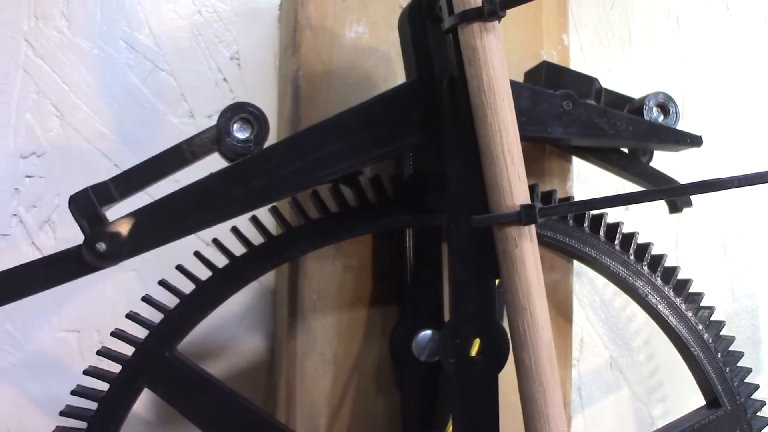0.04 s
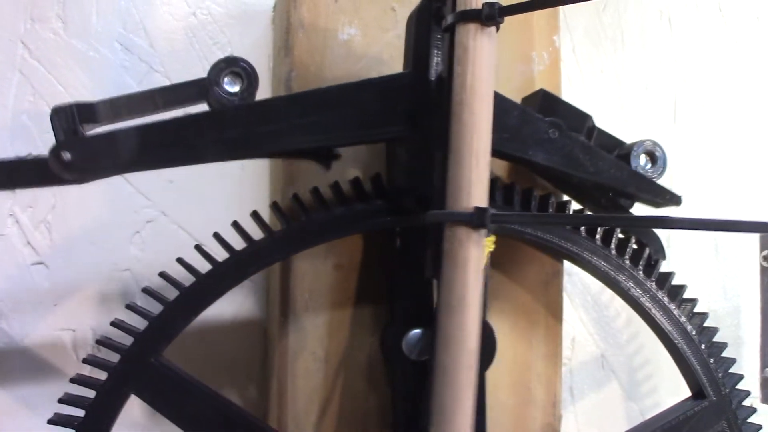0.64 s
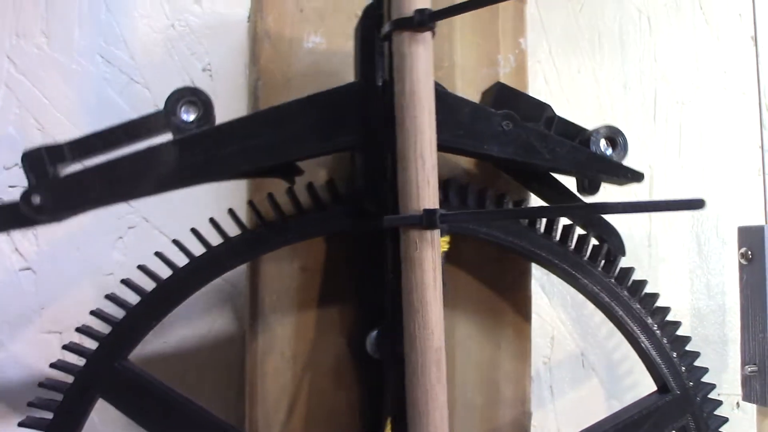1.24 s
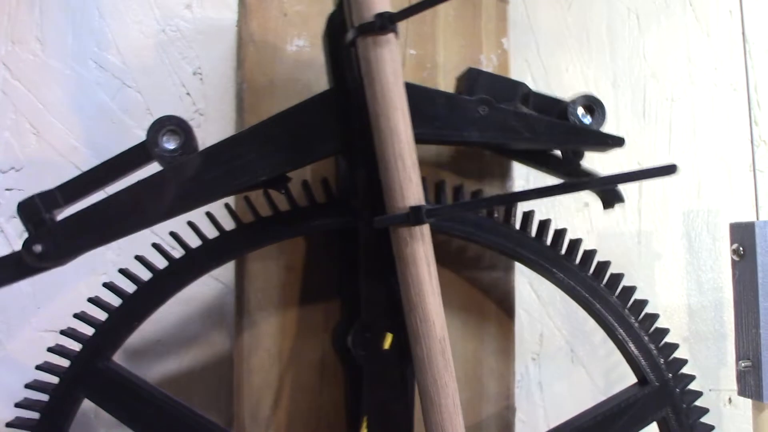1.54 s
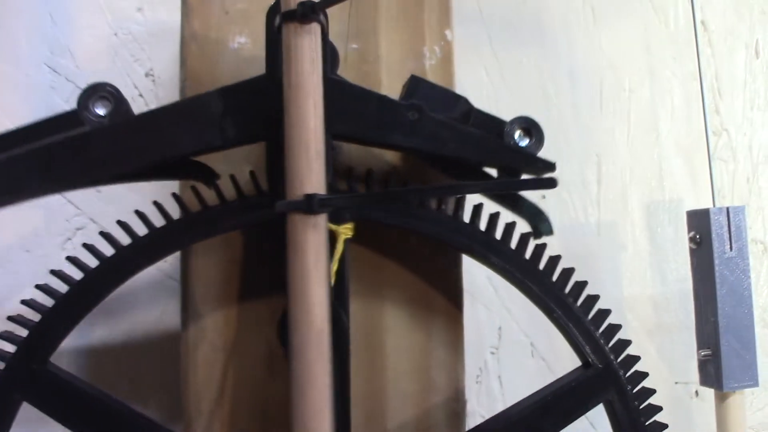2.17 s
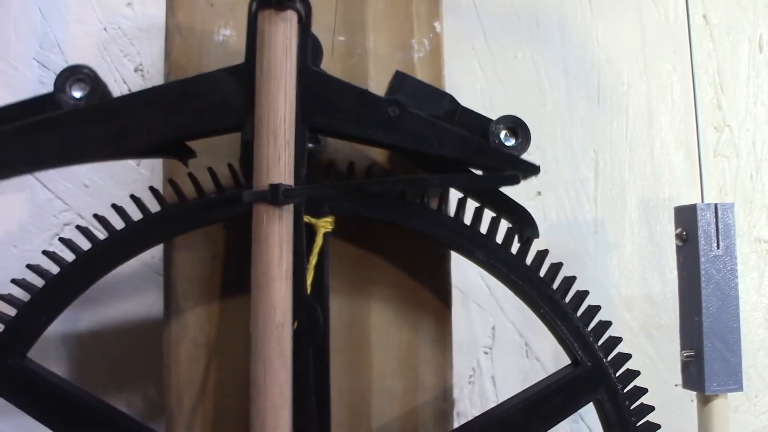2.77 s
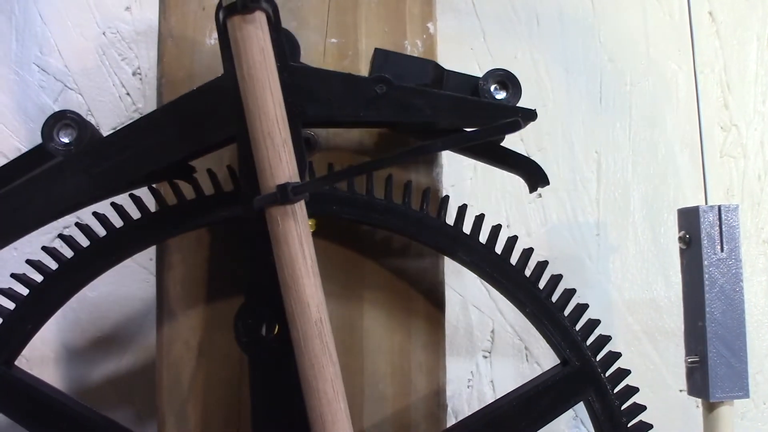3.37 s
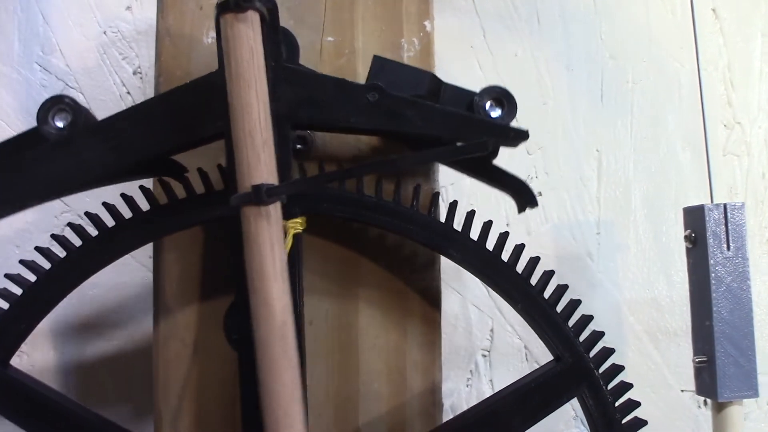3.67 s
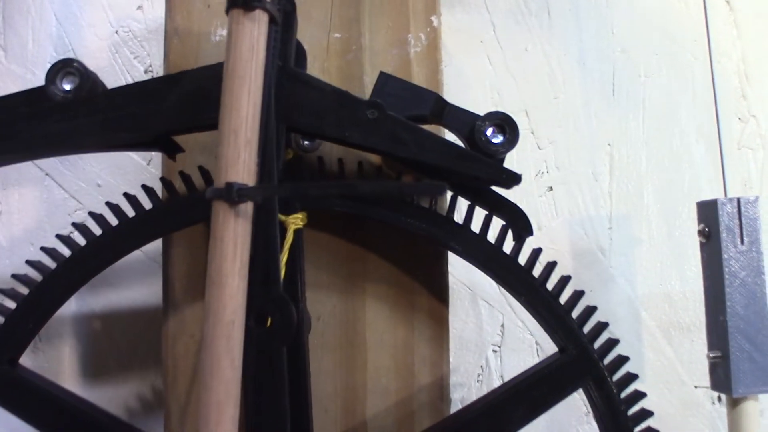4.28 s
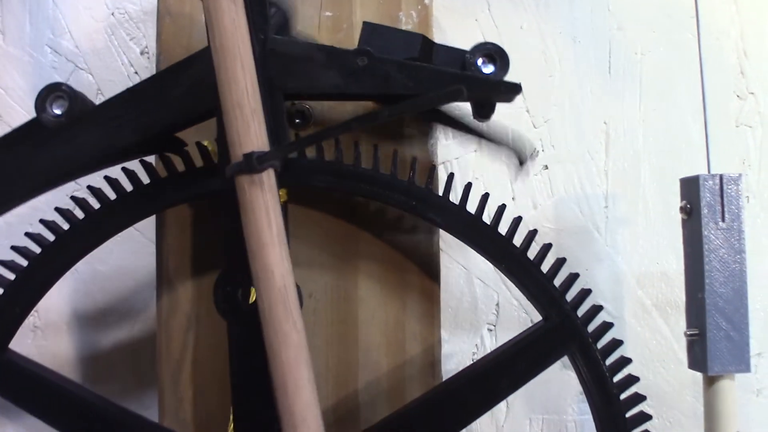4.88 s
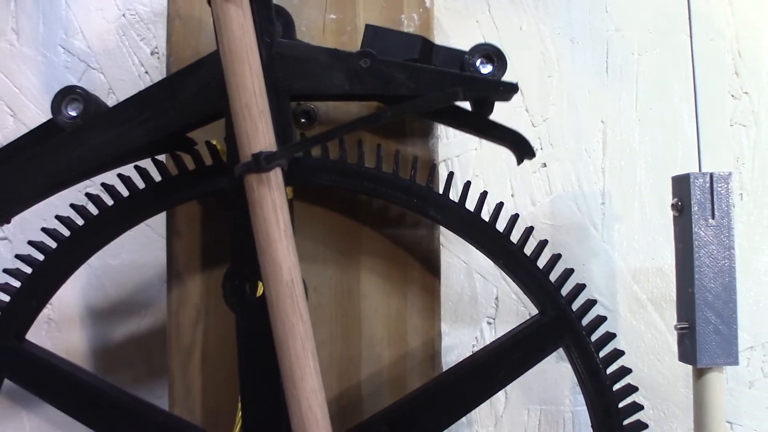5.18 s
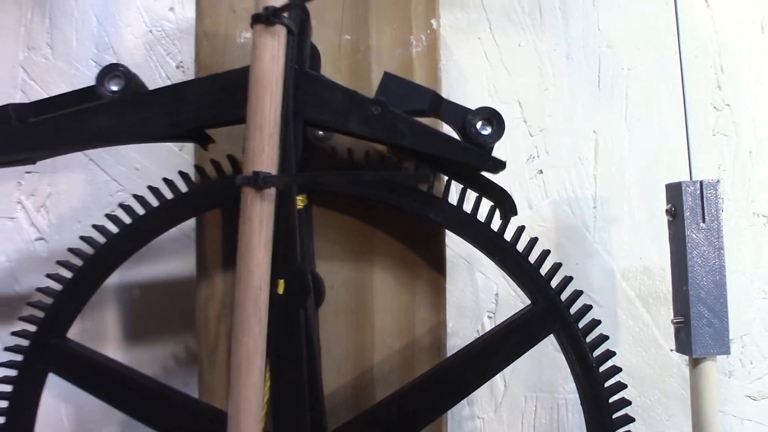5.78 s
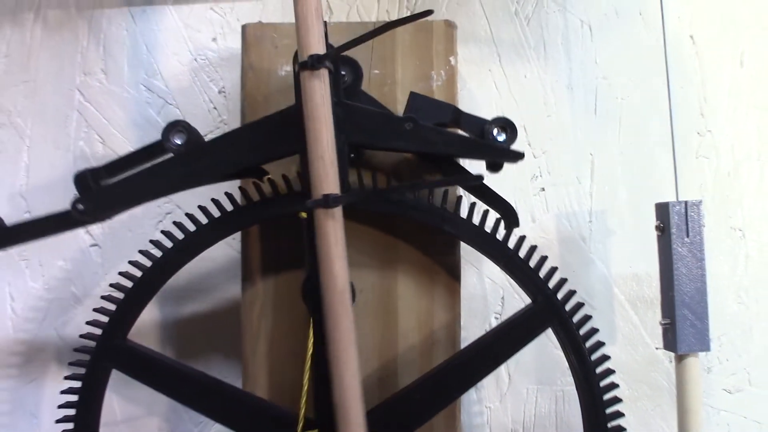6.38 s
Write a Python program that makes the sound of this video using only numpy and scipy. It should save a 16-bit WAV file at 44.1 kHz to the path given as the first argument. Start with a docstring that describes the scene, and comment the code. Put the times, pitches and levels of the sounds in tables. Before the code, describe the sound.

Slow, uneven sharp ticks from a plastic clock's catches and toothed wheel, with softer hollow knocks and light rubbing in a quiet workshop.

```python
"""In a quiet workshop, a plastic pendulum mechanism ticks close by.
Two catches take turns stopping a toothed wheel, one with a tock and one with a tick: each lifts, drops,
chatters and comes to rest, and the wheel bounces twice. The pendulum rubs once on every swing,
the rocking arm knocks on the frame, loose joints click, and the room hums."""
import sys
import numpy as np
from scipy import signal
from scipy.fft import rfft, irfft
from scipy.io import wavfile

SR = 44100
rng = np.random.default_rng(int(sys.argv[2]) if len(sys.argv) > 2 else 0)


def wav_out(sig):
    """Save sig, one row per channel (or a flat mono array), as 16-bit PCM at SR to the path in sys.argv[1]."""
    wavfile.write(sys.argv[1], SR, np.round(np.clip(np.atleast_2d(sig).T, -1, 1) * 32767).astype(np.int16))


N = 287532
T = np.arange(SR // 2) / SR  # seconds since a hit

# Knocks of the arm: t/s, level/dB, chatter/s, last touch/dB, brightness/(dB per octave), favoured f/Hz
KNOCKS = [(0.1758, -27, 0.0026, -14, 3.5, 1440), (.266, -40, 0.011, -3, -4, 1490),
          (1.1222, -29.5, 0.0018, -16, 2.5, 1640), (1.1424, -34.5, 0.019, -11, -2, 1340),
          (2.1636, -43.5, 0.0024, -3, -1.5, 1400), (2.53, -31, 0.0073, 3, 0, 1350),
          (2.922, -43, 0.0039, -15, -5.5, 1480), (3.7423, -31, 0.0054, -13, 2.5, 1120),
          (3.764, -31.5, .013, -9, -2, 1350), (5.1448, -29, 0.0039, 3, -0.46, 1226),
          (5.397, -48, 0.01, -7, -0.8, 1450), (6.3492, -24.5, 0.0043, 3, 1.35, 1090)]
# The wheel's "body", its many weak ringing tones blurred into noise: f/Hz, level/dB
WHEEL_BODY = [(150, -3), (260, -6.5), (780, -6.5), (1200, -13), (1900, -4), (2800, -2), (4500, 0),
              (5700, -0.5), (7500, -6), (9000, -10.5), (11000, -12), (12500, -18), (16000, -31)]


def amp(db):
    """Turn decibels into a number to multiply by."""
    return 10 ** (np.asarray(db) / 20)


def unit(x):
    """Scale a sound to an energy of one."""
    return x / np.sqrt(np.sum(x ** 2))


def rms(x):
    """The average strength of a sound (root mean square)."""
    return np.sqrt(np.mean(x ** 2))


def add(out, s, x):
    """Mix x into out, starting at s seconds."""
    i = max(int(s * SR), 0)
    out[i:i + len(x)] += x[:max(len(out) - i, 0)]


def noise(points, size, tilt_db=0):
    """Noise of strength one, shaped by (f/Hz, level/dB) points; tilt_db per octave makes it brighter."""
    octave = np.log2(np.maximum(np.fft.rfftfreq(size, 1 / SR), 1))
    hz, db = np.transpose(points)
    colour_db = np.interp(octave, np.log2(hz), db) + tilt_db * np.maximum(octave, np.log2(512))
    x = irfft(rfft(rng.standard_normal(size)) * amp(colour_db), size)
    return x / rms(x)


def wander(rate, size):
    """Glide to a new random value, usually within -1 to 1, rate times a second."""
    targets = rng.standard_normal(512)
    return np.interp(np.arange(size) / SR * rate, np.arange(len(targets)), targets)


def contacts(chatter_s, last_db, gap_s=0.0017, rise_s=0.00021):
    """Power fed into a part: a first hit, a buzz of tiny touches, and a last touch as it comes to rest."""
    count = max(int(chatter_s * SR), 2)
    power = np.zeros(len(T))
    buzz = rng.exponential(size=len(T))[:count] ** 3
    power[:count] = buzz / buzz.sum() * chatter_s / gap_s
    power[0] += 1
    power[count] += amp(last_db) ** 2
    # plastic gives a little, so each touch takes a moment to build
    return signal.lfilter([1], [1, -np.exp(-1 / (rise_s * SR))], power)


def ring(power, t60):
    """How strongly a part rings as it stores this power; t60 is the seconds it takes to fade by 60 dB."""
    keep = np.exp(-2 * np.log(1000) / (t60 * SR))
    return np.sqrt(signal.lfilter([1], [1, -keep], power + 1e-18))


def strike(power, tilt_db, modes, body, modes_db, body_t60, frame_db, frame_t60):
    """One hit: a bright crack, a short clack, the part's own tones (modes) and the frame's duller ring."""
    crack_db, linger_db = -5, -8
    frame_fade = unit(ring(power, frame_t60))
    crack = unit(noise(body, len(T), tilt_db + 1.5) * ring(power, t60=.002))
    clack = unit(noise(body, len(T), tilt_db) * ring(power, body_t60))
    frame = unit(noise(body, len(T), tilt_db - 1.5) * frame_fade)
    tones = 0
    for hz, db, t60 in modes:
        # the point of contact shifts, so each tone varies a little from hit to hit
        pitch_hz = hz * (1 + .002 * rng.standard_normal())
        phase = 2 * np.pi * (pitch_hz * T + rng.random())
        gain = amp(db + tilt_db * np.log2(max(hz, 500) / 4000) + .8 * rng.standard_normal())
        # part of each tone lingers in the frame
        fade = np.hypot(unit(ring(power, t60)), amp(linger_db + frame_db) * frame_fade)
        tones = tones + gain * unit(np.sin(phase) * fade)
    return unit(clack + amp(crack_db) * crack) + amp(modes_db) * tones + amp(frame_db) * frame


def hits(rows, modes, body, gain_db, modes_db, body_t60, frame_db, frame_t60):
    """Strike one part once per row; the row's level plus gain_db sets the strength of the first 20 ms."""
    out = np.zeros(N)
    for s, db, chatter_s, last_db, tilt_db in rows:
        power = contacts(chatter_s, last_db)
        x = strike(power, tilt_db, modes, body, modes_db, body_t60, frame_db, frame_t60)
        add(out, s, x * amp(db + gain_db) / rms(x[T < .02]))
    return out


def hit(s, db, chatter_s, last_db, tilt_db):
    """One row for hits()."""
    return s, db, chatter_s, last_db, tilt_db


def workshop(air_db=-49.5, hum_hz=90.8, hum_db=-58, whine_hz=7380, whine_db=-78, side_db=-73):
    """The room rumbles and hisses, with a wavering low hum and a faint high whine."""
    # Background noise of the room: f/Hz, level/dB
    room = [(12, -15), (20, -6), (59, -2.5), (95, -4), (161, -8), (196, -13.5), (315, -15), (416, -19),
            (452, -18), (834, -23), (1010, -24), (2400, -29.5), (5850, -33), (7310, -34), (15500, -39.5)]
    air = noise(room, N) * amp(air_db + 0.46 * wander(11, N))
    hum_phase = 2 * np.pi * np.cumsum(hum_hz + 2.17 * wander(9, N)) / SR
    hum = np.sin(hum_phase) * amp(hum_db + 3 * wander(5.01, N))
    whine_phase = 2 * np.pi * np.cumsum(whine_hz + 25 * wander(70, N)) / SR
    whine = np.sin(whine_phase) * amp(whine_db + 2 * wander(37, N))
    # faint noise, added on the left and taken away on the right, gives width
    side = noise([(25, -26), (70, 1), (300, 4), (1500, -4.5), (8000, -9.5), (13000, -6.5)], N)
    return air + np.sqrt(2) * (hum + whine) + np.array([[1], [-1]]) * side * amp(side_db)


def grit(length_s, release_s=0.015, grain_db=4.5, flutter_db=3.5, ring_db=-5):
    """Plastic slides on plastic: a gritty, fluttering hiss that makes the parts ring faintly."""
    # Hiss of sliding plastic: f/Hz, level/dB
    hiss_shape = [(300, 6), (1100, -1), (1700, 3), (3200, -2), (4800, -0.5), (5700, 4.5), (6500, 4),
                  (7300, -5), (8300, -8.5), (14000, -30)]
    # Tones of the rubbed parts: f/Hz, level/dB, t60/s
    rub_modes = [(1730, -10, .2), (2880, -14, .06), (4300, -10, .08), (5450, -8, .02), (5720, -4, .028),
                 (6300, -7, .035), (7150, -8, .035)]
    slide = np.exp(-np.maximum(T - length_s / 2, 0) / (release_s + length_s / 4))
    grip = amp(grain_db * wander(698, len(T)) + flutter_db * wander(73, len(T)))
    grains = noise(hiss_shape, len(T)) * grip * slide
    hiss = unit(grains)
    for hz, db, t60 in rub_modes:
        mode = np.sin(2 * np.pi * hz * T) * np.exp(-np.log(1000) * T / t60)
        hiss = hiss + amp(db + ring_db) * unit(signal.fftconvolve(grains, mode)[:len(T)])
    return hiss / rms(hiss[T < length_s])


def rubs(cycle_s=1.999):
    """Now and then a part scrapes dryly; the pendulum rubs once on the way out and once on the way back."""
    # Short, dry scrapes: t/s, length/s, hiss/dB
    scrapes = [(0.078, 0.025, -44.5), (4.346, 0.07, -58)]
    # The pendulum's two rubs: first t/s, length/s, hiss/dB, groan/dB
    swing_rubs = [(0.243, 0.069, -49.5, -46.5), (1.276, .1, -50.5, -51.5)]
    out = np.zeros(N)
    for first_s, length_s, hiss_db, groan_db in swing_rubs:
        for s in np.arange(first_s, N / SR, cycle_s):
            add(out, s, amp(hiss_db) * grit(length_s) + amp(groan_db) * groan(length_s))
    for s, length_s, hiss_db in scrapes:
        add(out, s, amp(hiss_db) * grit(length_s))
    return out


def arm(boost_db=5, reach_hz=90):
    """The long rocking arm knocks with a hollow ring; where it is hit decides which tone stands out."""
    # The arm's strong tones: f/Hz, level/dB, t60/s
    arm_modes = [(185.8, -7, 0.49), (1057, -6, 0.052), (1148, -4.5, 0.14), (1256, -12, 0.23),
                 (1408, -8, 0.16), (1487, -5.5, 0.15), (1660, -8.5, 0.057), (2192, -16, 0.054),
                 (2376, -6, 0.042), (2454, -8, 0.028), (3648, -4.5, 0.007), (4380, -7, 0.02),
                 (5220, -12, 0.028)]
    # Its blur of weak tones: f/Hz, level/dB
    arm_body = [(150, 3), (550, -4.5), (850, -1.5), (1200, 8), (1850, -3), (2400, -0.5), (3100, -3),
                (3800, 0.5), (5700, -2.5), (8000, -8), (9400, -19), (11000, -9.5), (12500, -26),
                (16000, -43)]
    out = np.zeros(N)
    for *knock, favoured_hz in KNOCKS:
        modes = [(hz, db + boost_db * np.exp(-((hz - favoured_hz) / reach_hz) ** 2), t60)
                 for hz, db, t60 in arm_modes]
        out += hits([knock], modes, arm_body,
                    gain_db=-2, modes_db=-1.5, body_t60=0.022, frame_db=-1, frame_t60=0.17)
    return out


def bumps(rise_s=0.0067, thump_hz=189.5, thump_db=-3.5, lag_s=0.00954):
    """The frame thumps under each knock, harder the longer the arm pushes; a few dull bumps come alone."""
    # Soft, low bumps: t/s, f/Hz, peak level/dB
    lone_bumps = [(0.946, 145, -38.5), (1.712, 108, -39), (3.614, 132, -38), (4.39, 119, -36.5),
                  (4.676, 132, -41)]
    thumps = [(s + lag_s, thump_hz, db + thump_db + 20 * np.log10(push_s / 0.017))
              for s, db, push_s, *_ in KNOCKS]
    out = np.zeros(N)
    swell = (T / rise_s) * np.exp(1 - T / rise_s)
    for s, hz, db in lone_bumps + thumps:
        add(out, s, amp(db) * swell * np.sin(2 * np.pi * hz * T))
    return out


def groan(length_s):
    """A low groan swells in the middle of the pendulum's rub."""
    # Low noise of the rub: f/Hz, level/dB
    groan_shape = [(200, -22), (315, -15), (348, 3), (380, -13), (420, -4), (480, -11), (700, -19),
                   (2000, -42)]
    swell = np.exp(-((T - 0.46 * length_s) / (.5 * length_s)) ** 2)
    x = noise(groan_shape, len(T)) * swell
    return x / rms(x[T < length_s])


def tocks(rebound_s=.038, bounce_ratio=.43, bounce_db=-14):
    """One catch lifts with a ping and drops with a buzz; the wheel springs back, then clicks to rest."""
    # Drops of this catch: t/s, level/dB, chatter/s, last touch/dB, brightness/(dB per octave),
    # head start of the lift/s, lift/dB, wheel's rebound/dB
    events = [(0.5935, -25.5, 0.0072, 2.5, -0.89, 0.037, -43, -34),
              (2.2629, -24.5, 0.012, -3, -.2, .0354, -46, -30),
              (3.9474, -25, .0105, -6, 0.57, 0.044, -39, -30.5),
              (5.6294, -26.5, 0.011, -6, 0.53, 0.046, -40.5, -31.5)]
    # Tones of the lifting catch, the dropping catch and the wheel springing back: f/Hz, level/dB, t60/s
    lift_modes = [(366, -16, 0.056), (792, -15, 0.27), (2350, -6, 0.024), (2547, -2.5, 0.03),
                  (3120, -19, 0.021), (4080, -7, 0.017)]
    drop_modes = [(360, -12.5, .06), (790, -17, .03), (1890, -13, .025), (2760, -12, .02),
                  (3220, -3.5, .025), (3480, -14, .015), (5540, -9, .012), (5696, -2, .028),
                  (5890, -8, .016), (6380, -9, .012), (9500, -14, .01)]
    rebound_modes = [(166, -13.5, 0.058), (809, -17, 0.07), (1550, -16, 0.052), (2740, -6.5, 0.022),
                     (2830, -17, 0.027), (2920, -6.5, .025), (3225, -5, 0.013), (3620, -7, 0.031),
                     (5820, -7, 0.015), (9450, -15, 0.014), (11000, -16, .01)]
    # The dropping catch's blur of weak tones: f/Hz, level/dB
    drop_body = [(150, -4.5), (550, -3.5), (820, -1), (1200, -15), (1700, 0), (2250, -7.5), (2800, 5),
                 (4200, -3), (5700, 8.5), (7500, -4), (9300, -2.5), (10200, -11.5), (11300, -3),
                 (12500, -17), (16000, -25)]
    lifts, drops, rebounds, settles = [], [], [], []
    for s, db, chatter_s, last_db, tilt_db, lead_s, lift_db, rebound_db in events:
        lands_s = s + rebound_s
        lifts.append(hit(s - lead_s, lift_db, chatter_s=0.0033, last_db=4, tilt_db=tilt_db - 2.5))
        drops.append(hit(s, db, chatter_s, last_db, tilt_db))
        rebounds.append(hit(lands_s, rebound_db, chatter_s=0.0053, last_db=-5, tilt_db=tilt_db))
        settles.append((lands_s + bounce_ratio * rebound_s, rebound_db + bounce_db, .0078, tilt_db))
    return (hits(lifts, lift_modes, WHEEL_BODY,
                 gain_db=1.5, modes_db=5, body_t60=0.01, frame_db=7.5, frame_t60=0.081)
            + hits(drops, drop_modes, drop_body,
                   gain_db=0, modes_db=-3.5, body_t60=0.0043, frame_db=-11, frame_t60=0.16)
            + hits(rebounds, rebound_modes, WHEEL_BODY,
                   gain_db=0, modes_db=3, body_t60=0.019, frame_db=-9.5, frame_t60=0.15)
            + clicks(settles))


def clicks(rows, last_db=-3):
    """Loose parts click as they meet. Rows: t/s, level/dB, chatter/s, brightness/(dB per octave)."""
    # Strong tones of a loose part: f/Hz, level/dB, t60/s
    loose_modes = [(1640, -6, 0.061), (2400, -24, .03), (2590, -20, 0.02), (5330, -12, 0.014)]
    # Its blur of weak tones: f/Hz, level/dB
    loose_body = [(150, 3.5), (700, 3.5), (1250, -5.5), (2300, 6), (3000, -4), (5300, -3), (7000, -15),
                  (8200, -16), (10000, -28), (11300, -16), (13000, -34), (16000, -44)]
    touches = [hit(s, db, chatter_s, last_db, tilt_db) for s, db, chatter_s, tilt_db in rows]
    return hits(touches, loose_modes, loose_body,
                gain_db=-0.5, modes_db=-7, body_t60=0.0051, frame_db=-2.5, frame_t60=0.11)


def loose_joints(faint_count=7, faint_db=-58, scatter_db=2):
    """The joints click now and then: a few clearly, the rest faintly and at random."""
    # The clear clicks: t/s, level/dB, chatter/s, brightness/(dB per octave)
    clear = [(1.1045, -43.5, .0017, 4.5), (1.79, -53, 0.017, 1), (2.7841, -40.5, 0.0073, 2),
             (2.854, -42.5, 0.0018, 1), (4.4672, -43, 0.0048, 2.5), (6.15, -46, 0.0041, 2)]
    faint = [((k + place) / faint_count * N / SR, faint_db + scatter_db * (2 * size - 1), .007, 2.5)
             for k, (place, size) in enumerate(rng.random((faint_count, 2)))]
    return clicks(clear + faint)


def ticks(slack_lead_s=.093, slack_db=-49, rebound_s=.0368, bounce_ratio=.87, bounce_db=-11):
    """The other catch takes up its slack, lifts with a tap and drops hard; the wheel bounces twice."""
    # Drops of this catch: t/s, level/dB, chatter/s, last touch/dB, brightness/(dB per octave),
    # head start of the lift/s, lift/dB, wheel's rebound/dB
    events = [(1.5147, -20, 0.0026, 12, 1.66, 0.065, -43.5, -24.5),
              (3.1972, -22.5, 0.0016, 3, 0.75, 0.072, -50.5, -22.5),
              (4.87, -22, 0.0038, 7, 1, .0668, -45, -23), (6.554, -22, .003, 5, 1.3, .068, -49, -24)]
    # Tones of the tapping catch, the dropping catch and the landing wheel: f/Hz, level/dB, t60/s
    tap_modes = [(730, -11.5, 0.025), (1920, -14, 0.068), (3460, -8, 0.031), (5380, 0, 0.0097),
                 (6650, -9, .012), (8380, -13, 0.012)]
    drop_modes = [(510, -21, .03), (720, -13, .03), (2900, -13, .01), (3300, -9, .009), (3500, -9, .009),
                  (3760, -12, .012), (5415, -6, .03), (6320, -5.5, .024), (6480, -9, .04),
                  (6730, -11, .035), (7190, -14, .03), (7970, -5.5, .015), (8440, -14, .02),
                  (9970, -11, .02), (10400, -13, .008), (14200, -21, .012)]
    wheel_modes = [(170, -18.5, 0.075), (787, -25, 0.1), (1844, -17, 0.083), (2160, -13.5, 0.08),
                   (2288, -11, 0.019), (2585, -11, 0.037), (3040, -19, .03), (3575, -7.5, 0.034),
                   (4640, -13, 0.021), (5370, -11, 0.024), (5500, -14, 0.017)]
    # The dropping catch's blur of weak tones: f/Hz, level/dB
    drop_body = [(150, -8), (380, -7.5), (750, -3), (1150, -9.5), (1900, -3.5), (2700, -8), (3600, 2),
                 (4700, -2.5), (7500, -1.5), (9000, -9.5), (11300, -6), (13000, -15.5), (16000, -30)]
    slack, drops, rebounds, taps = [], [], [], []
    for s, db, chatter_s, last_db, tilt_db, lead_s, lift_db, rebound_db in events:
        lands_s = s + rebound_s
        again_s = lands_s + bounce_ratio * rebound_s  # the second bounce is shorter
        slack.append((s - slack_lead_s, slack_db, .007, .7))
        taps.append(hit(s - lead_s, lift_db, chatter_s=0.0019, last_db=-16, tilt_db=-2))
        drops.append(hit(s, db, chatter_s, last_db, tilt_db))
        rebounds.append(hit(lands_s, rebound_db, chatter_s=.0072, last_db=8.5, tilt_db=tilt_db - 0.9))
        taps.append(hit(again_s, rebound_db + bounce_db, chatter_s=.0036, last_db=-3, tilt_db=-0.4))
    return (clicks(slack)
            + hits(drops, drop_modes, drop_body,
                   gain_db=0, modes_db=-1, body_t60=0.011, frame_db=-7, frame_t60=0.084)
            + hits(rebounds, wheel_modes, WHEEL_BODY,
                   gain_db=-2.5, modes_db=-1, body_t60=0.011, frame_db=-10, frame_t60=0.11)
            + hits(taps, tap_modes, WHEEL_BODY,
                   gain_db=-0.5, modes_db=-0.5, body_t60=0.023, frame_db=-6, frame_t60=0.14))


def scene(echo_s=.003, echo_db=-32):
    """The mechanism sits straight ahead; one faint echo from the side gives it a little width."""
    mechanism = ticks() + tocks() + arm() + loose_joints() + rubs() + bumps()
    echo = np.zeros(N)
    add(echo, echo_s, mechanism * amp(echo_db))
    return mechanism + np.array([[1], [-1]]) * echo + workshop()


def record(dry, top_hz=15900):
    """A steep filter cuts away the highest treble."""
    return signal.sosfilt(signal.ellip(10, .1, 80, top_hz, fs=SR, output="sos"), dry)


dry = scene()
out = record(dry)
wav_out(out)
```